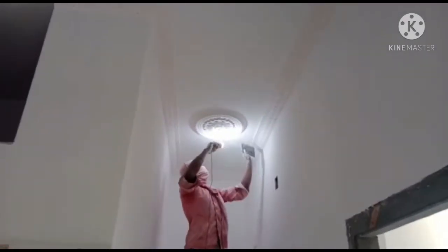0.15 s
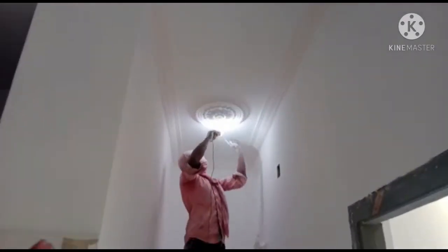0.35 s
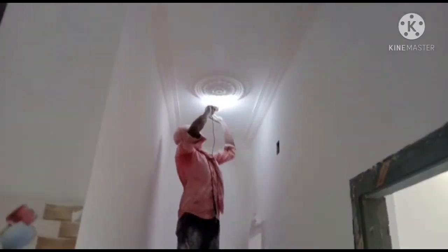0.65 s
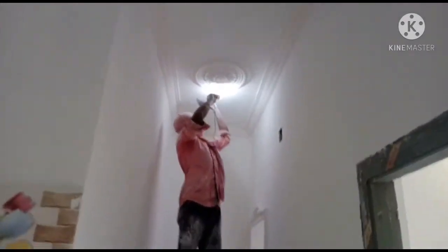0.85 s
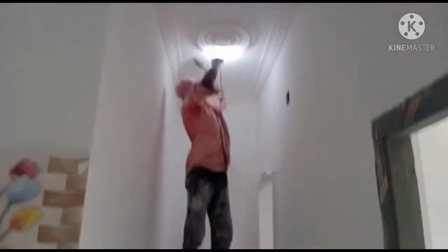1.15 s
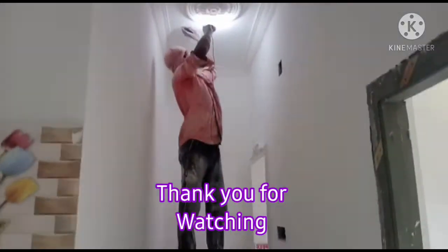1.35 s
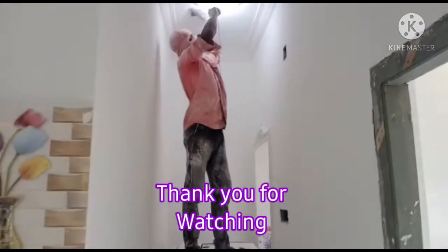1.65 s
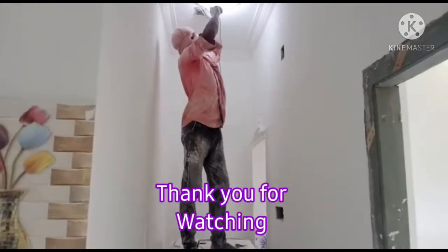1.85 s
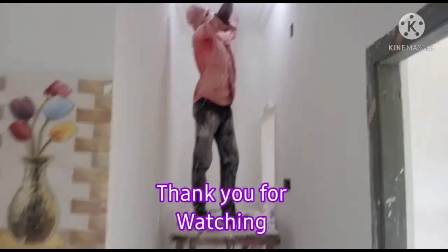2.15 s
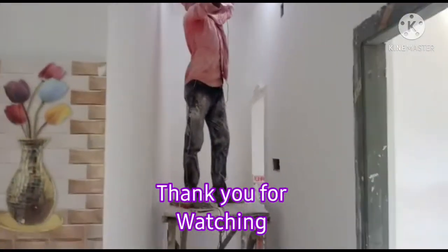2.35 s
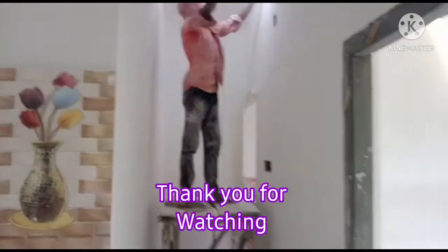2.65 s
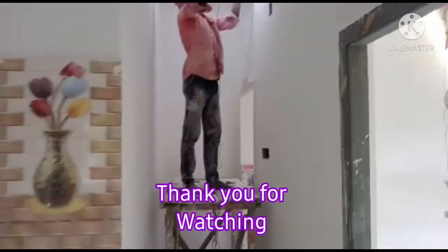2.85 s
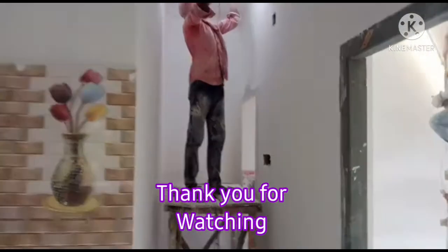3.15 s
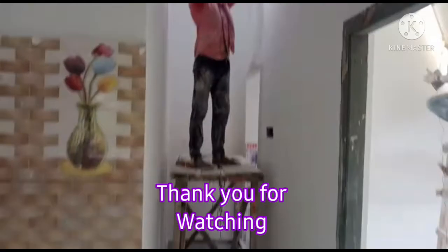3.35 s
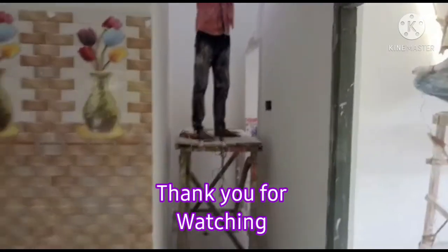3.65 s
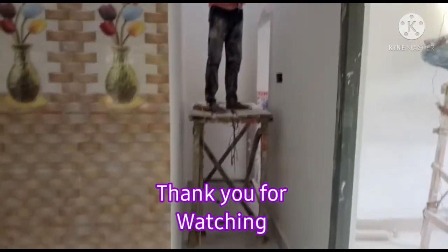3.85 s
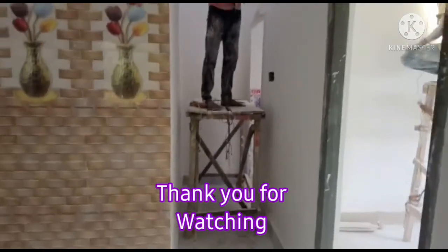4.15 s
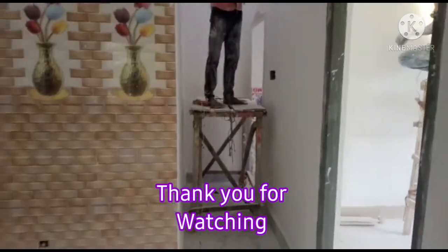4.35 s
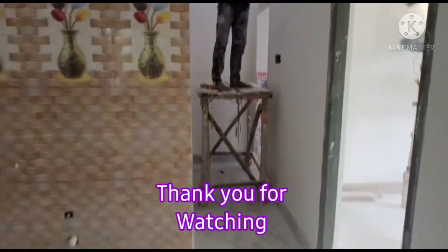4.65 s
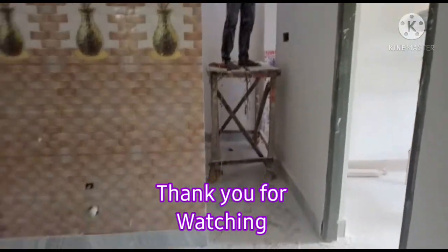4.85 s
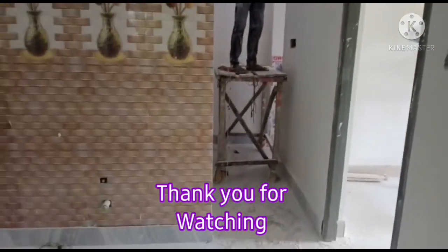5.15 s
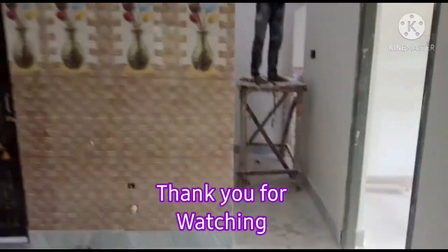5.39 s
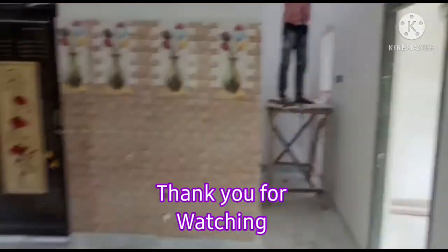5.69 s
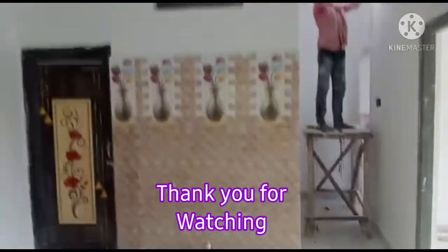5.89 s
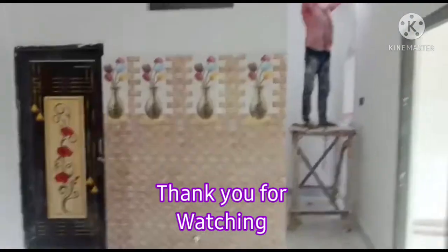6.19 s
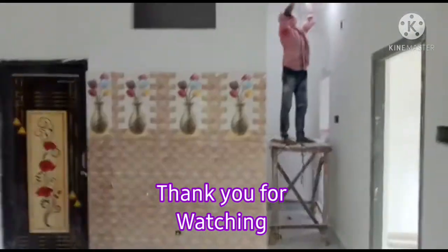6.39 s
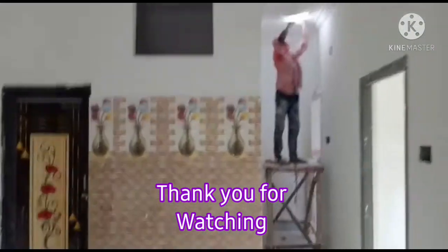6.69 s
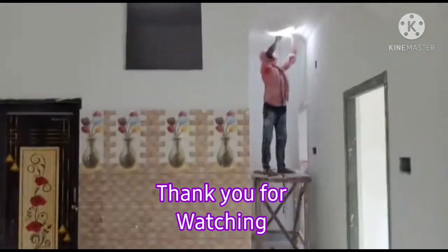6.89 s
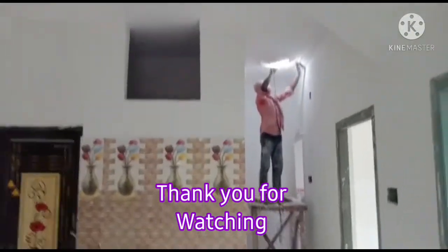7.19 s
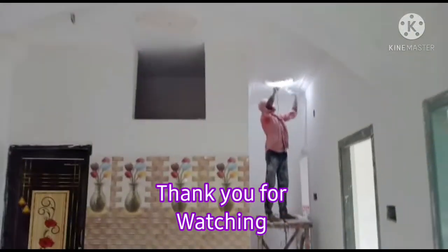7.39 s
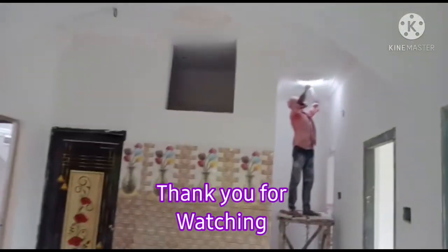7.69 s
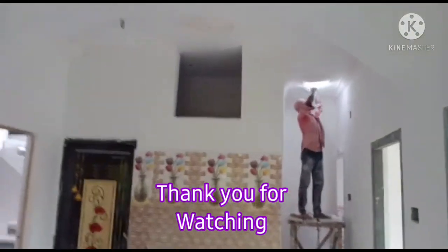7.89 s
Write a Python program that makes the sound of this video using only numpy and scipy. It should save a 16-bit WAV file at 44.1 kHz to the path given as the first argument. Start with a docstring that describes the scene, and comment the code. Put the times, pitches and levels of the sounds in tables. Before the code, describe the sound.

Sandpaper rasps over plaster by hand in a bare room, heard from some distance with an echo around each stroke. One quick, bright swipe opens, followed by soft low handling thuds, faint wipes and a few dry ticks of grit. From about 1.5 seconds, long sweeps grow louder and brighter, ending with a soft pat near 2.6 seconds. After a lull, brisk, gritty strokes run from 3.5 to 5.5 seconds, three or four a second, the loudest sanding. Softer strokes follow. Around 5.8 seconds fingers shift on the microphone, briefly changing the tone of the hiss, and give it a sharp, close bump at 6.25 seconds. Two moderate strokes come near 6.7 and 7.1 seconds, then lighter ones until the end at 8 seconds. A dull rubbing drone and a low room hush lie faintly underneath.

```python
"""Sanding putty in a bare house

A man on a wooden trestle sands overhead by hand: light wipes, long sweeps, then brisk strokes.
Grit hisses and crackles, brighter the faster the paper moves; the plaster drones faintly under it.
Mono, from a hand-held phone far enough off for the bare walls to echo around each stroke.
Late on, the hand holding the phone shifts, shades the microphone and bumps the case."""
import sys
import numpy as np
from scipy import signal
from scipy.fft import rfft, irfft, next_fast_len
from scipy.io import wavfile
from scipy.ndimage import uniform_filter1d

SR = 44100
rng = np.random.default_rng(int(sys.argv[2]) if len(sys.argv) > 2 else 0)


def generate_wav(signal):
    """Clip the signal to [-1, 1] and save it as 16-bit WAV at the path in sys.argv[1]."""
    frames = np.transpose(np.atleast_2d(signal))
    scaled = np.clip(frames, -1, 1) * 32767
    pcm = np.round(scaled).astype(np.int16)
    wavfile.write(sys.argv[1], SR, pcm)


N = 354123
TIME = np.arange(N) / SR

# Passes of the paper. Each row: fastest moment, time speeding up and time slowing down in seconds,
# relative rasp level in dB, brightness in dB per octave, rub level in dB.
STROKES = [(0.01, 0.075, 0.076, -26, 2, -38.5), (0.64, 0.068, 0.062, -46, -4.5, -52.5),
           (1.05, 0.037, 0.061, -46.5, -5, -64), (1.42, 0.059, 0.17, -43.5, -7, -53),
           (1.72, 0.35, 0.17, -41, -2, -47), (1.99, 0.26, .2, -34.5, -0.8, -44.5),
           (2.33, 0.25, 0.19, -32, -1.5, -45), (2.53, 0.29, 0.15, -28, 2.5, -45.5),
           (2.64, .03, 0.055, -39, -18, -37), (2.85, 0.36, 0.4, -53.5, -6.5, -56),
           (3.35, 0.092, 0.068, -40.5, -2, -50.5), (3.64, 0.21, 0.21, -25.5, 1.5, -50),
           (3.97, .15, 0.16, -25, 1.65, -58), (4.23, 0.16, 0.1, -25, 2.4, -71),
           (4.51, 0.15, 0.14, -25.5, 2, -66), (4.75, 0.16, 0.12, -26.5, 2, -68),
           (5.039, 0.22, 0.21, -25, 2.5, -63), (5.35, 0.18, 0.18, -25.5, 2.5, -65),
           (5.47, 0.075, 0.17, -33.5, 4, -43.5), (5.8, .22, 0.31, -35.5, 1.5, -64),
           (5.97, 0.049, 0.25, -38, -2.5, -58), (6.17, 0.13, 0.13, -36, 3, -51),
           (6.43, 0.17, 0.14, -38, 2, -57.5), (6.679, 0.16, 0.24, -31, 3, -49),
           (7.11, 0.26, 0.14, -31.5, 3, -45), (7.27, .1, 0.22, -54, 7, -51.5),
           (7.74, 0.099, 0.17, -41, -4, -45), (7.9, 0.35, 0.27, -38, 3, -57)]
# Grit on putty in a brisk stroke. Each row: frequency in Hz, relative level in dB.
RASP_SPECTRUM = [(200, -67), (600, -32.5), (1000, -23), (1400, -14.5), (1750, -5.5), (2250, 2.5),
                 (3000, -1), (4000, -3.47), (4700, -8.5), (5600, -11), (9000, -11.5), (11000, -14.5),
                 (14000, -8.5), (15500, -12)]
# The paper catching and slipping. Each row: flutter rate in Hz, relative level in dB.
CHATTER_SPECTRUM = [(3, -2), (20, -6.5), (70, -10.5), (250, -23), (900, -57)]
# Coarse grains snapping. Each row: time in seconds, relative level in dB, decay in seconds,
# brightness in dB per octave.
GRAIN_SNAPS = [(.438, -41.5, 0.0073, -5.5), (0.558, -44, .004, -6), (1.012, -49, .008, -8),
               (1.3754, -38.5, 0.0023, -3.5), (1.380, -46, 0.0028, -3), (1.404, -41.5, .03, -10.5),
               (1.409, -36, .0015, -3), (3.028, -44, .0015, 4), (3.250, -40.5, 0.0072, -5.5)]
# The plaster's dull rub. Each row: frequency in Hz, relative level in dB.
RUB_SPECTRUM = [(40, -36), (90, -6.5), (140, -6.5), (300, -29), (550, -8), (800, -3), (1100, 0), (1400, 4),
                (1600, 6), (1750, 8), (2000, 3), (2600, -36), (6000, -40)]
# The pad set down on the plaster. Each row: time in seconds, level in dB, decay in seconds.
PAD_PATS = [(0.039, -43, 0.077), (1.375, -46, 0.16), (2.622, -39.5, 0.038), (5.47, -44.5, 0.085),
            (7.69, -46, 0.03)]
# One pat of the pad. Each row: frequency in Hz, relative level in dB.
PAT_SPECTRUM = [(30, -49), (80, 8), (140, 4), (400, 9), (900, 3.5), (1700, -5), (2600, 9), (8000, -33)]
# Fingers bumping the phone. Each row: time in seconds, level in dB, rise and decay in seconds,
# brightness in dB per octave.
CASE_BUMPS = [(5.774, -43.5, 0.0025, 0.0052, -4), (5.874, -45, 0.0049, 0.0049, -3),
              (6.233, -29, 0.0018, .006, -5), (6.247, -18.5, 0.005, 0.0073, 1.5),
              (6.261, -28, 0.0027, 0.01, 1), (6.271, -28.5, 0.0022, 0.011, -2.5)]
# Skin scuffing the case. Each row: frequency in Hz, relative level in dB.
SCUFF_SPECTRUM = [(30, -45), (70, -11), (120, -10.5), (200, -4.5), (300, -6), (560, 0.5), (750, -7.5),
                  (1300, -7.5), (2000, -12), (3400, -17), (5000, -25), (9000, -24), (15000, -32)]
# The case's brief ring. Each row: frequency in Hz, relative level in dB, seconds to fall 60 dB.
CASE_MODES = [(192, -15, 0.046), (236, -10, 0.082), (302, 5.5, 0.04), (397, -3, 0.094), (427, -3, 0.036),
              (557, -4, 0.035), (883, 3, 0.029), (1280, -7, 0.023), (1910, -4, 0.022), (3340, 1, .012)]
# Soft handling thuds. Each row: time in seconds, level in dB, rise and decay in seconds.
HANDLING_THUDS = [(.07, -47, .015, 0.024), (0.221, -48, 0.011, 0.014), (0.296, -45, 0.017, 0.02),
                  (.35, -46, 0.0087, .015), (5.658, -56.5, .02, 0.037), (5.779, -52, .005, .02),
                  (6.06, -54, .01, 0.023)]
# One low thud. Each row: frequency in Hz, relative level in dB.
THUD_SPECTRUM = [(20, -24), (45, -18), (75, 4), (110, -12), (170, -18), (500, -60)]
# The microphone's port. Each row: time in seconds, resonance and width in Hz, peak in dB,
# share shaded by the hand from 0 to 1.
MIC_PORT = [(0, 7720, 740, 12, 0.04), (5.5, 7670, 720, 14, 0.35), (5.82, 7470, 700, 12, 0.52),
            (5.89, 6700, 1500, 2, 0.94), (5.96, 5600, 1800, 0.5, 1), (6.05, 6500, 1800, -2.5, 1),
            (6.2, 7200, 1600, -5, 1), (6.28, 7800, 1300, 13, 0.42), (6.4, 8360, 1530, 12.5, 0.12),
            (8.03, 8470, 1410, 12, 0.19)]
# The microphone fully shaded. Each row: frequency in Hz, gain in dB.
HAND_SHADE = [(1000, -5.5), (1600, -2.5), (2200, -5.5), (2900, 3), (3700, 11), (4600, 8.5), (6000, 7),
              (8500, 0), (11000, -8.5), (12500, -10.5), (14000, -16), (16000, -19)]
# The bare room's reverberation. Each row: frequency in Hz, seconds to fall 60 dB.
ROOM_T60 = [(125, 4.6), (500, 0.82), (1500, 1), (3000, 0.89), (5000, 0.65), (7500, 0.65), (15000, 0.44)]
# Faint, narrow whines. Each row: start and end in seconds, centre and half-width in Hz, level in dB.
WHINES = [(1.802, 2.344, 711, 28, -59), (2.62, 3.65, 670, 46, -63), (2.705, 3.606, 977, 48.6, -62.5),
          (4.446, 4.98, 813, 120, -54.5), (6.956, 7.3, 1100, 138.9, -53)]
# Room tone of the house. Each row: frequency in Hz, relative level in dB.
ROOM_TONE_SPECTRUM = [(20, -39), (45, -40), (70, -3.5), (130, -2), (300, -3.5), (500, -5.5), (800, -8.5),
                      (1500, -7), (3000, -15.5), (6000, -29), (11500, -29), (15000, -30)]
# The room tone's drift. Each row: time in seconds, level in dB.
ROOM_TONE_LEVELS = [(0, -56), (2.5, -55.5), (5.5, -55), (6, -55.5), (7.5, -60.5), (8.03, -54)]

LOUDER_DB, RUB_LOUDER_DB, BRIGHTER_DB_PER_OCT = 5, 5.5, 3  # per doubling of hand speed
REST_RASP_DB, REST_RUB_DB, REST_DB_PER_OCT = -55.5, -69, -6.5  # the paper creeping between strokes
EASE_DB = 1.5  # rasp lost by the end of a stroke as the hand lightens its pressure


def hand_strokes():
    """Each stroke speeds up and slows in an arch; gives the rasp's gain, its tilt and the rub's gain."""
    rasp_power = np.full(N, gain_of(REST_RASP_DB) ** 2)
    rub_power = np.full(N, gain_of(REST_RUB_DB) ** 2)
    weighted_tilt = REST_DB_PER_OCT * rasp_power
    for fastest, rise, fall, rasp_db, tilt, rub_db in STROKES:
        moving = (TIME > fastest - rise) & (TIME < fastest + fall)
        t = TIME[moving] - fastest
        speed = np.cos(np.pi / 2 * t / np.where(t < 0, rise, fall))
        doublings = np.log2(speed + 1e-9)
        power = gain_of(rasp_db + LOUDER_DB * doublings - EASE_DB * np.maximum(t / fall, 0)) ** 2
        rasp_power[moving] += power
        weighted_tilt[moving] += power * (tilt + BRIGHTER_DB_PER_OCT * doublings)
        rub_power[moving] += gain_of(rub_db + RUB_LOUDER_DB * doublings) ** 2
    return np.sqrt(rasp_power), weighted_tilt / rasp_power, np.sqrt(rub_power)


def sandpaper(rasp_gain, tilt, grains_per_s=4500, spread_db=1.5, hiss=0.78, chatter_db=1.27):
    """Countless grains scratch the putty; the paper catches and slips as the hand drives it."""
    sizes = gain_of(spread_db * np.minimum(rng.exponential(1, N), 4))
    signs = rng.choice([-1, 1], N)
    scratching = rng.random(N) < grains_per_s / SR
    grit = unit_rms(sizes * signs * scratching) + hiss * rng.standard_normal(N)
    grit = unit_rms(grit * gain_of(chatter_db * noise(CHATTER_SPECTRUM)))

    def colour(hz, t, flicker_db=0.51):
        """Faster strokes are brighter; changing contact patches make the colour flicker."""
        patches = uniform_filter1d(rng.standard_normal((len(hz), len(t))), size=12, axis=0)
        patches = unit_rms(uniform_filter1d(patches, size=10, axis=1))
        octaves = np.log2(np.clip(hz, 1700, 11500) / 2750)
        return at_hz(RASP_SPECTRUM, hz) + np.interp(t, TIME, tilt) * octaves + flicker_db * patches

    return 2 * gain_of(2.5) * rasp_gain * moving_filter(grit, colour)


def grain_snaps(boost_db=2):
    """Single coarse grains break with a dry tick or drag for a moment."""
    out = np.zeros(N)
    for when, db, decay, tilt in GRAIN_SNAPS:
        add_burst(out, when, db + boost_db, 0.0003, decay, RASP_SPECTRUM, tilt)
    return out


def plaster(rub_gain):
    """The plaster drones dully under the hand and gives a pat when the pad is set down."""
    out = rub_gain * noise(RUB_SPECTRUM)
    for when, db, decay in PAD_PATS:
        add_burst(out, when, db, 0.003, decay, PAT_SPECTRUM)
    return out


def handling(ring_db=-7, fingertip_rise_s=0.00076):
    """Bumps and thuds right at the microphone, carried through the case with no room on them."""
    out, blows = np.zeros(N), np.zeros(N)
    for when, db, rise, decay, tilt in CASE_BUMPS:
        add_burst(out, when, db, rise, decay, SCUFF_SPECTRUM, tilt)
        blows[round(when * SR)] = gain_of(db + ring_db)
    for when, db, rise, decay in HANDLING_THUDS:
        add_burst(out, when, db, rise, decay, THUD_SPECTRUM)
    t = TIME[:SR // 10]
    ring = sum(gain_of(db - 60 * t / t60) * np.cos(2 * np.pi * hz * t + k * np.pi / 2)
               for k, (hz, db, t60) in enumerate(CASE_MODES))
    ring *= 1 - np.exp(-t / fingertip_rise_s)
    return out + signal.oaconvolve(blows, ring)[:N]


def mic_port(hz, t):
    """Gain in dB of the port: it rings in the treble; a hand over it lowers the ring and cuts the top."""
    centre, width, peak_db, shaded = at_time(MIC_PORT, t)
    return peak_db * np.exp(-((hz - centre) / width) ** 2 / 2) + shaded * at_hz(HAND_SHADE, hz)


def room(source, direct_db=-4.0, patterns=10, hold_samples=600):
    """Hand and phone keep moving, so each moment's sound meets a different pattern of echoes."""
    pattern = np.arange(N) // hold_samples % patterns
    echoes = sum(signal.fftconvolve(source * (pattern == k), wall_echoes())[:N] for k in range(patterns))
    return gain_of(direct_db) * source + echoes


def wall_echoes(early_db=-12, tail_db=-2, reflections=16, build_up_s=0.0048):
    """Bare walls return a few near reflections and a long tail whose treble dies first."""
    def decay_db(hz, t):
        """Each band dies at its own rate but carries the same energy."""
        t60 = at_hz(ROOM_T60, hz)
        return -60 * t / t60 - 10 * np.log10(t60)

    tail = moving_filter(rng.standard_normal(SR), decay_db)
    tail *= 1 - np.exp(-TIME[:SR] / build_up_s)
    response = gain_of(tail_db) * tail / np.linalg.norm(tail)
    delays = (rng.uniform(0.002, 0.025, reflections) * SR).astype(int)
    response[delays] += gain_of(early_db) * rng.choice([-1, 1], reflections) / np.sqrt(reflections)
    return response


def whines(fade_s=0.12):
    """Thin, unsteady tones fade in and out under the sanding."""
    out = np.zeros(N)
    for start, end, hz, width, db in WHINES:
        fade = np.clip(np.minimum(TIME - start, end - TIME) / fade_s, 0, 1)
        band = [(hz - 3 * width, -70), (hz - width, -14), (hz, 0),
                (hz + width, -14), (hz + 3 * width, -70)]
        out += gain_of(db) * fade * noise(band)
    return out


def room_tone():
    """The low hush of the house, drifting slowly in level."""
    level_db, = at_time(ROOM_TONE_LEVELS, TIME)
    return gain_of(level_db) * noise(ROOM_TONE_SPECTRUM)


def gain_of(db):
    """Decibels to amplitude."""
    return 10 ** (np.asarray(db) / 20)


def unit_rms(x):
    """Scales to rms 1."""
    return x / np.sqrt(np.mean(x ** 2) + 1e-20)


def at_hz(rows, hz):
    """A table's value at hz, interpolated on a log-frequency axis."""
    frequencies, values = np.transpose(rows)
    return np.interp(np.log(hz + 1), np.log(frequencies + 1), values)


def at_time(rows, t):
    """Each column of a timed table at the times t."""
    times, *columns = np.transpose(rows)
    return [np.interp(t, times, column) for column in columns]


def noise(spectrum, size=N, tilt=0):
    """Noise of rms 1 with a given spectrum, tilted in dB per octave above 200 Hz."""
    length = next_fast_len(size, real=True)
    hz = np.fft.rfftfreq(length, 1 / SR)
    colour = gain_of(at_hz(spectrum, hz) + tilt * np.log2(np.maximum(hz, 200)))
    return unit_rms(irfft(rfft(rng.standard_normal(length)) * colour, length)[:size])


def moving_filter(x, gain_db, size=512):
    """Filters x by gain_db(hz, t), a response that changes with time."""
    frames = dict(fs=SR, nperseg=size, noverlap=size - size // 4)
    hz, t, spectra = signal.stft(x, **frames)
    _, filtered = signal.istft(spectra * gain_of(gain_db(hz[:, None], t)), **frames)
    return filtered[:len(x)]


def add_burst(mix, peak_s, db, rise_s, decay_s, spectrum, tilt=0, size=16384):
    """Adds coloured noise that swells up to peak_s and dies away."""
    start = max(round(peak_s * SR) - size // 4, 0)
    t = TIME[start:start + size] - peak_s
    swell = np.exp(np.minimum(t / rise_s, -t / decay_s))
    mix[start:start + len(t)] += gain_of(db) * swell * noise(spectrum, size, tilt)[:len(t)]


def scene():
    """Sanding in the room, heard through one hand-held microphone, the same on both channels."""
    rasp_gain, tilt, rub_gain = hand_strokes()
    snaps = grain_snaps()
    hush = room_tone()
    sanding = sandpaper(rasp_gain, tilt) + plaster(rub_gain) + snaps
    airborne = room(sanding) + 0.1 * snaps + hush + whines()  # extra direct sound keeps the snaps dry
    mono = moving_filter(airborne, mic_port) + handling()
    return np.array([mono, mono])


def record(dry):
    """The phone cuts off the highest treble steeply."""
    lowpass = signal.firwin(511, cutoff=15560, window=("kaiser", 9), fs=SR)
    return signal.oaconvolve(dry, lowpass[None], "same")


dry = scene()
out = record(dry)
generate_wav(out)
```